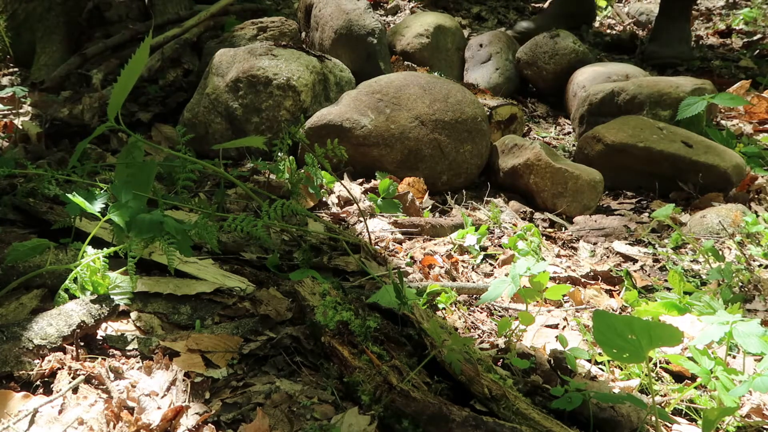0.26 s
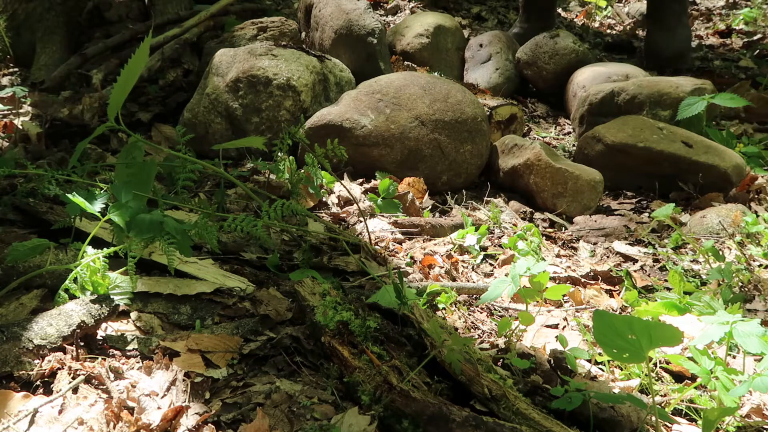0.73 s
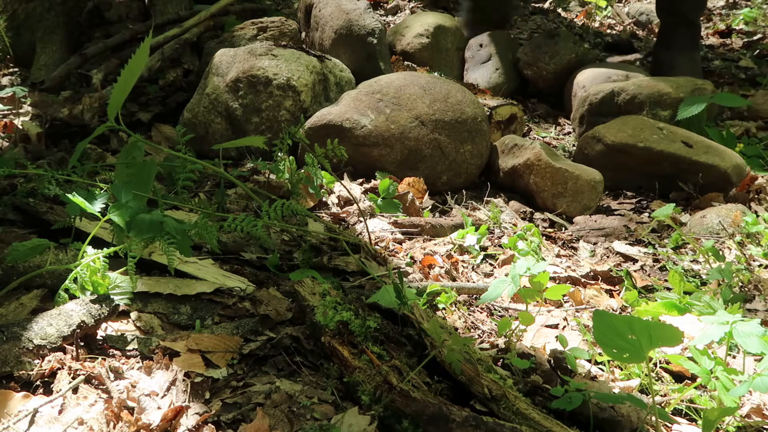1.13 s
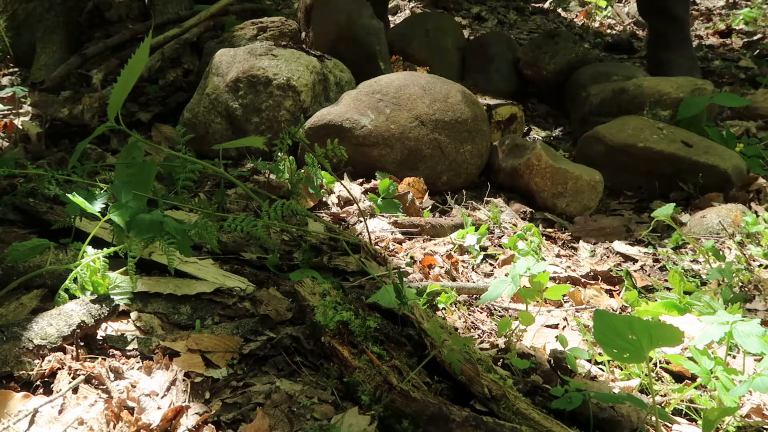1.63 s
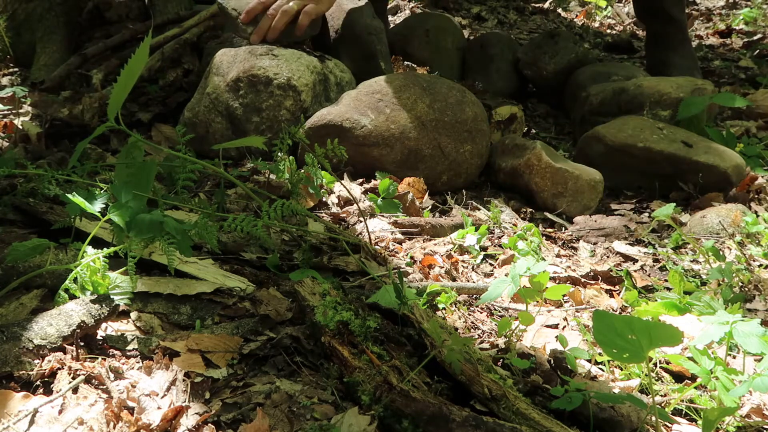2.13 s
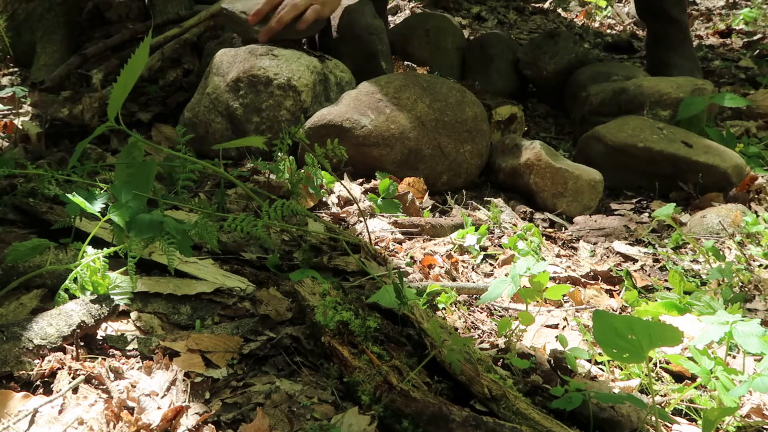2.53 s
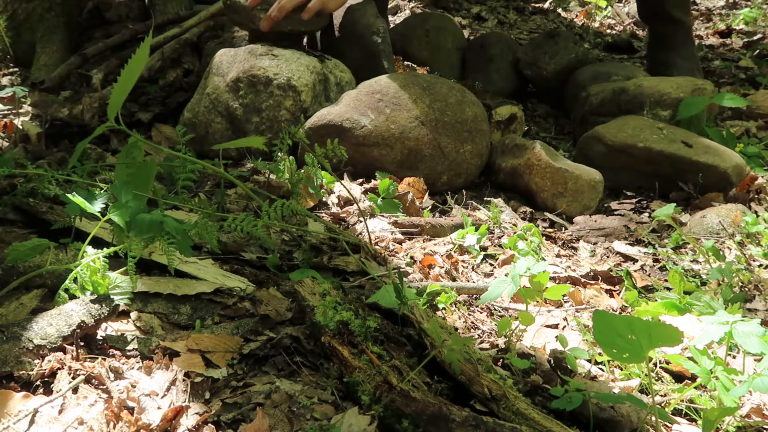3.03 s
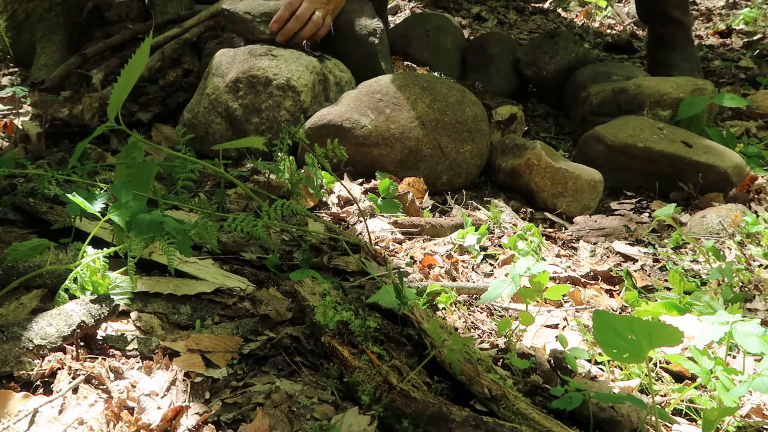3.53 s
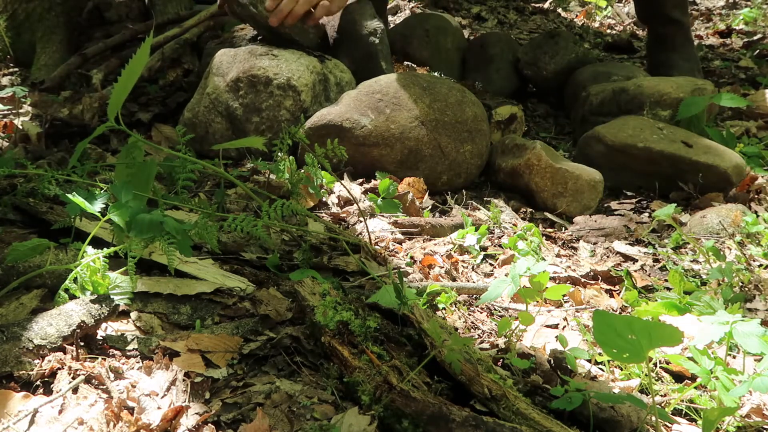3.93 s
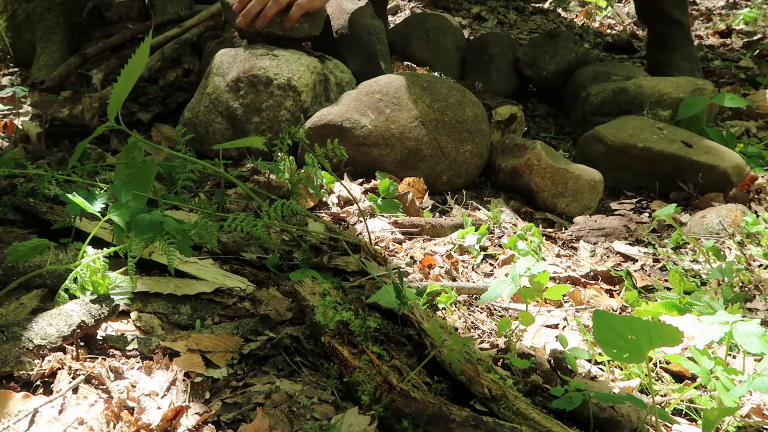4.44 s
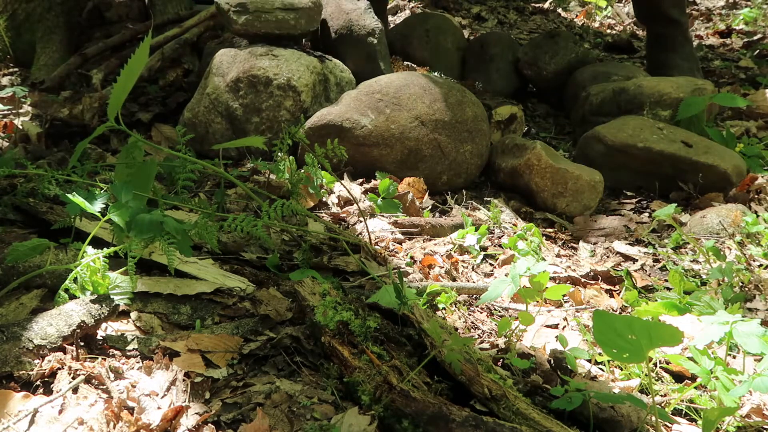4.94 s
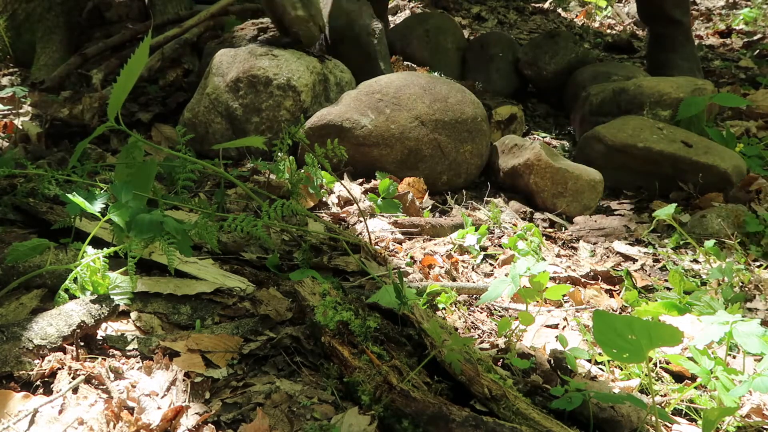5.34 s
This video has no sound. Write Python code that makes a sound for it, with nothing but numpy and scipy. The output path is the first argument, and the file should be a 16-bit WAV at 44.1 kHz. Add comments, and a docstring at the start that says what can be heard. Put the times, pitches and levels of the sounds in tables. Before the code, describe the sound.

An even, low-weighted hiss of trees runs throughout, with a barely audible thin high whine. Dry leaves flicker from about 0.4 s. Around 1.1 s soft footfalls thud on the ground, stones or soles grind, and a twig snaps brightly at 1.17 s; a heavier step lands at 1.5 s. At 2.1 s a stone strikes the pile in a very loud, clipped double clack, followed by small rattling bounces until 2.25 s. The small camera lowers its gain, dipping the background, then slowly recovers. Faint sliding comes at 2.7 s and 3.2 s, then a strong lower clack at 3.29 s. Duller knocks and rocking follow at 3.8-3.9 and 4.25 s, firmer ones at 4.54 and 5.16 s, with a last light tap at 5.3 s. All are short, woody-dry and close, with slight scatter from trunks. A faint wavering low hum appears after 4 s and swells again at the end, about 5.6 s.

```python
"""Trees hiss evenly with a thin whine, as shaped noise and a sine; dry leaves flicker as bright noise.
Sliding stones grind as trains of tiny contacts; feet thud as short damped pulses and a twig snaps as a noise burst.
Then rounded stones set down by hand on a pile knock and rock as damped modes, and a far hum, a wavering sine, rises.
A small camera with two close ports turns its gain down after hard blows and clips the hardest."""
import sys
import numpy as np
from scipy import signal
from scipy.fft import rfft, irfft
from scipy.io import wavfile
from scipy.ndimage import uniform_filter1d, minimum_filter1d

SR = 44100
rng = np.random.default_rng(int(sys.argv[2]) if len(sys.argv) > 2 else 0)


def invert_db(x):
    """Field ratio 10**(x/20) for x, a level in decibels (scalar or array-like)."""
    u = np.asarray(x, float) / 20
    return 10 ** u


def master(y):
    """Save y as 16-bit WAV."""
    cut = np.clip(np.atleast_2d(y).T, -1, 1)
    pcm = np.round(cut * 32767)  # scale
    wavfile.write(sys.argv[1], SR, pcm.astype(np.int16))


N = 246078
PILE_LAG_US, FEET_LAG_US = -18.5, 22  # delay of the left port in microseconds, negative = early


def evened(x):
    """Normalization: a signal of unit mean power has rms 1."""
    return x / np.sqrt(np.mean(x ** 2) + 1e-20)


def read(points, hz):
    """Spectral interpolation on a logarithmic frequency axis."""
    point_hz, value = np.transpose(points)
    return np.interp(np.log(hz + 1), np.log(point_hz + 1), value)


def lead(hz):
    """Interaural-style phase: a path difference makes the left port lead by an angle set by frequency."""
    # phase by which the left port leads: hz, lead_rad
    lead_points = [(0, 0), (2400, 0.43), (5800, -1.2), (10000, -2.5), (13000, -2.5), (16000, -2.5)]
    return np.interp(hz, *np.transpose(lead_points))


def mid_size(same, lead_rad):
    """Partial coherence: the mean of two partly alike channels has this size relative to either."""
    return np.sqrt(np.maximum(.5 + .5 * same * np.cos(lead_rad), .05))


def pair_noise(db, same, patchy_db):
    """Partially coherent noise: random short-time spectra with drifting patches, partly shared by the ports."""
    frames, hz = N // 256 + 5, np.fft.rfftfreq(1024, 1 / SR)
    a, b, c, d, patches = rng.standard_normal((frames, len(hz), 5)).T
    patches = uniform_filter1d(patches, size=12, axis=0)
    patches = evened(uniform_filter1d(patches, size=10, axis=1))
    same = np.clip(same(hz), -1, 1)[:, None]
    lead_rad = lead(hz)[:, None]
    right = a + 1j * b
    left = same * right + np.sqrt(1 - same ** 2) * (c + 1j * d)
    spectra = np.array([left * np.exp(1j * lead_rad), right])
    # the given spectrum counts for the mean of the ports
    spectra *= invert_db(db(hz)[:, None] + patchy_db * patches) / mid_size(same, lead_rad)
    noise = signal.istft(spectra, nperseg=1024, noverlap=768)[1][:, :N]
    return noise / np.std(noise.mean(0))


def woods():
    """Stationary noise and tones: even hiss of the trees, a wavering far hum and a thin steady whine."""
    # spectrum of the hiss, relative: hz, density_db_per_hz
    hiss_spectrum = [(20, -22), (50, -9), (100, 1), (220, -5), (450, -10), (650, -15), (1000, -14),
                     (1900, -14), (3200, -17), (4500, -22.5), (6200, -27), (9000, -36.5), (12000, -43),
                     (15500, -57.5)]
    # likeness of the two ports in the hiss: hz, likeness (1 = alike)
    likeness = [(60, 1), (150, 1), (400, 0.8), (1400, 0.93), (3000, 0.84), (7000, 0.31), (13000, 1)]
    # rms level of the hum over time: time_s, level_db
    hum_level = [(0, -84), (3.8, -73), (4.2, -49), (4.7, -48), (5.0, -55), (5.3, -59), (5.58, -44)]
    hiss = pair_noise(lambda hz: read(hiss_spectrum, hz), lambda hz: read(likeness, hz), patchy_db=1.02)
    t = np.arange(N) / SR
    waver = evened(uniform_filter1d(rng.standard_normal(N), size=6000))
    hum_hz = 181.9 + 3 * waver
    hum = np.sqrt(2) * np.sin(2 * np.pi * np.cumsum(hum_hz) / SR)
    hum *= invert_db(np.interp(t, *np.transpose(hum_level)))
    left_right_rad = np.array([[-2.6], [0]])
    whine = invert_db(-88) * np.sin(2 * np.pi * 13000 * t + left_right_rad)
    return invert_db(-42.5) * hiss + hum + whine


def swells(rows, floor_db, rise_s, t60_s):
    """Power addition: rows that rise to their start, hold and die away exponentially add to a steady floor."""
    t, power = np.arange(N) / SR, invert_db(2 * floor_db)
    for s, hold_s, db in rows:
        rise = np.clip(1 + (t - s) / rise_s, 0, 1) ** 2
        fade_db = 60 * np.maximum(t - s - hold_s, 0) / t60_s
        power = power + (rise * invert_db(db - fade_db)) ** 2
    return np.sqrt(power)


def rustle():
    """Amplitude modulation: dry leaves stirred are bright noise with a flickering level."""
    # spectrum of the leaves, relative: hz, density_db_per_hz
    leaf_spectrum = [(800, -16), (2000, 9), (4000, 6.5), (8000, -4), (12000, -5.5), (14500, -6.5),
                     (16000, -6)]
    # stirs, each rising beforehand to full level at its start: start_s, hold_s, level_db (before
    # flicker, rms of the part above 10 kHz)
    stirs = [(.38, .02, -62.5), (.59, 0.017, -54), (.77, 0.056, -63.5), (1.07, 0.098, -53),
             (1.24, .04, -60.5), (1.55, .01, -60), (2.03, .04, -65), (3.26, 0.013, -63), (3.63, .28, -68),
             (4.13, .03, -63.5), (4.27, 0.022, -66), (4.57, .02, -69), (5.31, .04, -63)]
    noise = pair_noise(lambda hz: read(leaf_spectrum, hz), lambda hz: 0 * hz + 0.66, patchy_db=1.0)
    above_10k = signal.butter(4, 10000, "high", fs=SR, output="sos")
    top = signal.sosfilt(above_10k, noise.mean(0))
    flicker = evened(uniform_filter1d(rng.standard_normal(N), size=200))
    level = swells(stirs, floor_db=-72.5, rise_s=0.067, t60_s=0.36)
    return noise / top.std() * level * invert_db(2.0 * flicker)


def ports(x, lag_us):
    """Time-of-arrival difference: both ports hear the same sound, the left one shifted by microseconds."""
    hz = np.fft.rfftfreq(len(x), 1 / SR)
    shift = np.exp(-2j * np.pi * hz * lag_us / 1e6)
    return np.array([irfft(rfft(x) * shift, len(x)), x])


def ring(contact_ms, pitch):
    """Modal excitation: a rounded push as long as the contact; a short one reaches the high modes."""
    # modes of the stones on their bed: hz (before the pitch factor), drive_db (before the push), t60_s
    stone_modes = [(112.1, -11.5, 0.031), (253, -2, 0.01144), (458, 2.5, 0.011), (769, -4, 0.0085),
                   (1070, -5, 0.006), (1400, -18, 0.014), (1675, -5.5, 0.0086), (2197, -9, 0.0046),
                   (3218, -18, 0.0051), (5000, -38, 0.003)]
    t = np.arange(2048) / SR
    push = np.exp(-.5 * ((t * 1000 / max(contact_ms, .1) - .5) * 5.5) ** 2)
    modes = np.zeros(len(t))
    for k, (hz, db, t60_s) in enumerate(stone_modes):
        age = np.log(1000) * t / t60_s
        swell = age * np.exp(1 - age)  # motion spreads through the pile and is soon damped
        sign = -(-1) ** k
        modes += sign * invert_db(db) * swell * np.sin(2 * np.pi * hz * pitch * t)
    motion = signal.fftconvolve(push, modes)[:len(t)]
    sound = np.gradient(motion)  # air hears the change of motion
    return sound / abs(sound).max()


def grind():
    """Stick-slip friction as a random impulse train: tiny soft contacts ring the same stones."""
    # stones, soil and soles sliding, each rising beforehand to full level at its start:
    # start_s, hold_s, level_db (rms)
    slides = [(.85, 0.15, -51.5), (1.08, 0.077, -39.5), (1.5, 0.052, -41.5), (2.13, .07, -40),
              (2.69, 0.039, -44.5), (3.15, 0.14, -50), (3.3, 0.0074, -38), (4.05, 0.23, -47),
              (5.0, .1, -60)]
    height, chance, side = rng.random((N, 3)).T
    height_db = -3.0 * np.log(height + 1e-9).clip(-4)
    happens = chance < 450 / SR  # 450 contacts a second on average
    contacts = invert_db(height_db) * happens * np.sign(side - .5)
    sound = evened(signal.oaconvolve(contacts, ring(contact_ms=1.74, pitch=0.762))[:N])
    level = swells(slides, floor_db=-52.5, rise_s=0.034, t60_s=0.22)
    return ports(level * sound, PILE_LAG_US)


def add(mix, s, sound):
    """Superposition: a two-channel sound adds to the mix from time s."""
    part = mix[:, round(s * SR):][:, :sound.shape[1]]
    part += sound[:, :part.shape[1]]


def puff(db, hz):
    """Heavy damping: soft ground gives back about two cycles."""
    t = np.arange(2048) / SR
    envelope = hz * t * np.exp(1 - hz * t / 0.39) / 0.44
    return ports(-invert_db(db) * np.sin(2 * np.pi * hz * t) * envelope, FEET_LAG_US)


def thuds():
    """Successive damped impacts: the heel, the weight behind it, then the sole rolling on."""
    # footfalls on soft ground: start_s, peak_db (of the heel, approximate), pitch_hz, roll_s
    footfalls = [(1.075, -24, 560, .005), (1.0814, -19, 202, .045), (1.172, -22.5, 170, .005),
                 (1.5, -14.5, 204, .03), (1.543, -21, 332, .02)]
    roll_gap_s, roll_db, roll_spread_oct = .016, -4.5, 0.52  # small presses of scattered pitch
    weight_late_s, weight_db, weight_hz = 0.0083, -6.5, 83  # levels are relative to the heel
    out = np.zeros((2, N))
    for (s, db, hz, roll_s), chance in zip(footfalls, rng.uniform(-1, 1, (len(footfalls), 8, 2))):
        add(out, s, puff(db, hz))
        if roll_s > roll_gap_s:
            add(out, s + weight_late_s, puff(db + weight_db, weight_hz))
        for k, (late, high) in enumerate(chance):
            after_s = (k + 1 + .15 * late) * roll_gap_s
            if after_s < roll_s:
                add(out, s + after_s, puff(db + roll_db, hz * 2 ** (roll_spread_oct * high)))
    return out


def snap():
    """Brittle fracture: a twig breaks underfoot in a short bright burst and raps a stone."""
    snap_s = 1.1698
    out, t = np.zeros((2, N)), np.arange(1024) / SR
    burst = rng.standard_normal(len(t))
    burst = signal.sosfilt(signal.butter(1, 2500, "high", fs=SR, output="sos"), burst)
    burst = signal.sosfilt(signal.butter(1, 6000, fs=SR, output="sos"), burst)
    decay = invert_db(-20 - 60 * t / 0.018)
    add(out, snap_s, ports(evened(burst) * decay, lag_us=42.0))
    add(out, snap_s, ports(invert_db(-17.5) * ring(contact_ms=1.26, pitch=1.12), FEET_LAG_US))
    return out


def knocks():
    """Impact and scattering: each blow rings the stones with a burst of grit, then echoes off pile and trunks."""
    # blows and bounces: start_s, peak_db (of the ring, before gain control), contact_ms, pitch_factor (on the modes)
    blows = [(2.104, 3.5, 0.8, 0.94), (2.113, -22, 1.7, 0.56), (2.1245, 4, 0.35, 0.94),
             (2.1261, -1.5, 0.39, 1), (2.131, -13.5, 0.7, 0.95), (2.151, -17, 1.15, 1.2),
             (2.163, -23, 1.7, 1.18), (2.174, -22, 0.82, 0.86), (2.1966, -17.5, 1.64, 0.67),
             (2.211, -32, 2.4, 0.84), (2.253, -26.5, 2.6, 0.93), (3.2886, 1, 0.54, 0.683),
             (3.296, -18, 0.72, 1.2), (3.305, -17, 1.2, 0.99), (3.785, -10, 2.86, 0.98),
             (3.8899, -16.5, 0.3, 1.05), (3.904, -22.5, 2.11, 0.89), (3.913, -17.5, 4, 0.94),
             (3.924, -23, 3.2, 1.05), (4.067, -29, 3.1, 0.51), (4.150, -30.5, 2.1, 0.69),
             (4.237, -23.5, 2.2, 0.75), (4.252, -10, 2.46, 1.04), (4.265, -15.5, 3, 1.02),
             (4.292, -9.5, 2.83, 0.95), (4.5414, -3.5, 1.54, 1), (4.555, -22, 1.24, 0.84),
             (4.802, -24, 2.8, 0.5), (5.1621, -2.5, 1.34, 1.02), (5.1855, -13, 2.05, 0.99),
             (5.198, -24, 1.9, 0.82), (5.318, -27.5, 2.4, 1.15)]
    out, t = np.zeros((2, N)), np.arange(2048) / SR
    grit = rng.standard_normal((len(blows), len(t)))
    grit = signal.sosfilt(signal.butter(1, (1600, 3300), "band", fs=SR, output="sos"), grit)
    grit = signal.sosfilt(signal.butter(2, 6500, fs=SR, output="sos"), grit)
    for (s, db, contact_ms, pitch), burst in zip(blows, grit):
        # grit relative to the blow: more for each halving of contact, less for each dB of blow
        crack_db = max(-27 - 10.5 * np.log2(contact_ms) - 0.33 * db, -33)
        onset = np.minimum(t / 0.00076, 1)
        crack = burst / grit.std() * invert_db(crack_db - 60 * t / 0.019) * onset
        add(out, s, ports(invert_db(db) * (ring(contact_ms, pitch) + crack), PILE_LAG_US))
    echo_t = np.arange(SR // 4) / SR
    scatter = rng.standard_normal((len(echo_t), 2)).T * invert_db(-60 * echo_t / 0.14)
    scatter = 1.6 * scatter[0] + 0.16 * scatter  # mostly shared by the ports
    scatter /= np.linalg.norm(scatter[0])
    return out + invert_db(-18.5) * signal.oaconvolve(out, scatter, axes=1)[:, :N]


def scene():
    """Superposition: all sources add at the two ports."""
    return woods() + rustle() + grind() + thuds() + snap() + knocks()


def band_limit(x):
    """A steep low-pass at the top of the band."""
    return signal.sosfilt(signal.butter(12, 16450, fs=SR, output="sos"), x)


def record(dry):
    """Feedforward gain control: gain falls after loud blows, holds and creeps back; the converter clips."""
    smooth = np.exp(-1 / (0.034 * SR))
    power = signal.lfilter([1 - smooth], [1, -smooth], (dry ** 2).mean(0))
    power_db = 10 * np.log10(power + 1e-12)
    hold = round(.35 * SR)
    held_db = -minimum_filter1d(-power_db, size=hold, origin=(hold - 1) // 2)  # loudest of the last 0.35 s
    fall_db = np.arange(N) * 4.73 / SR  # the held level sinks by 4.73 dB a second
    sinking_db = np.maximum.accumulate(held_db + fall_db) - fall_db
    over_db = np.maximum(sinking_db + 16, 0)  # excess over a threshold of -16 dB
    slow = np.exp(-1 / (0.0657 * SR))
    cut_db = 1.95 * signal.lfilter([1 - slow], [1, -slow], over_db)
    return band_limit(np.clip(dry / invert_db(cut_db), -1, 1))


dry = scene()
out = record(dry)
master(out)
```